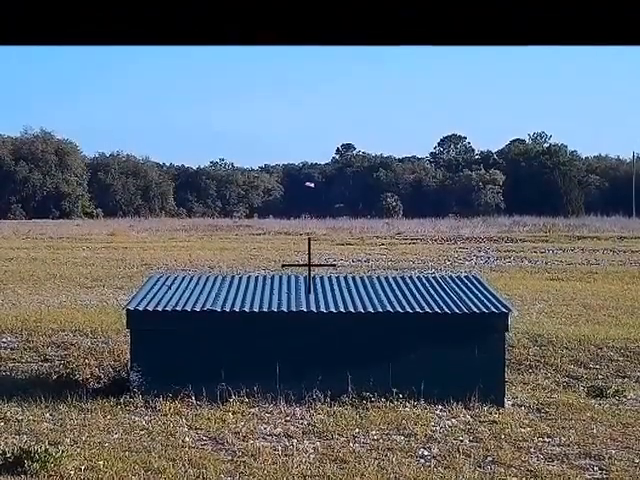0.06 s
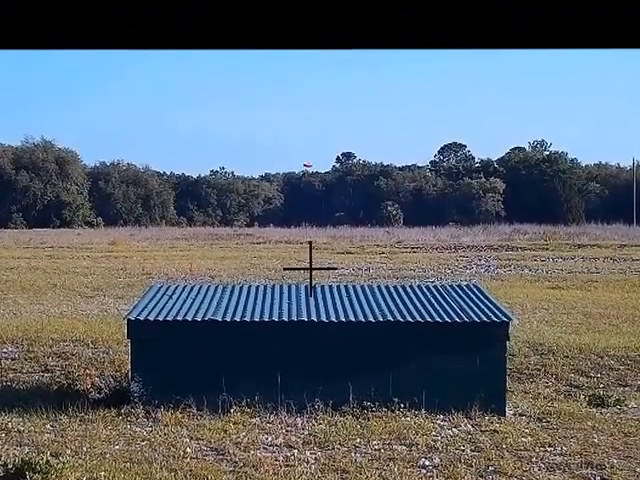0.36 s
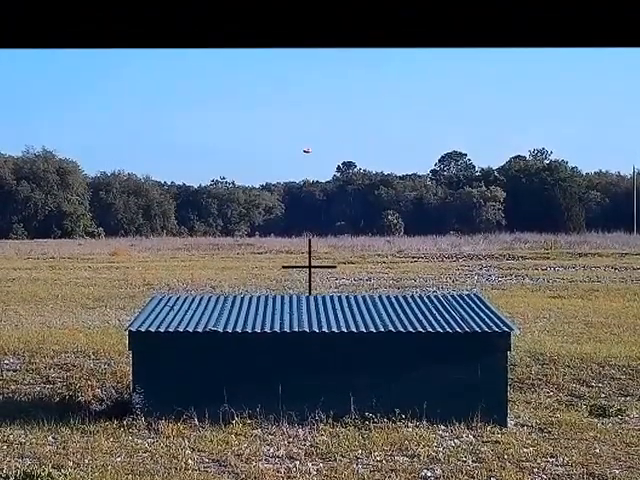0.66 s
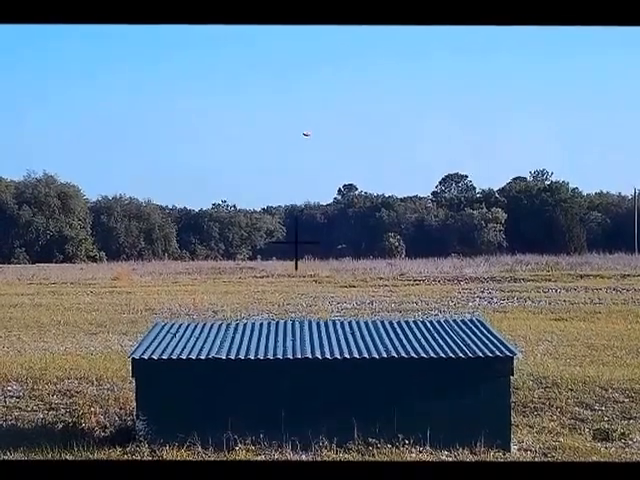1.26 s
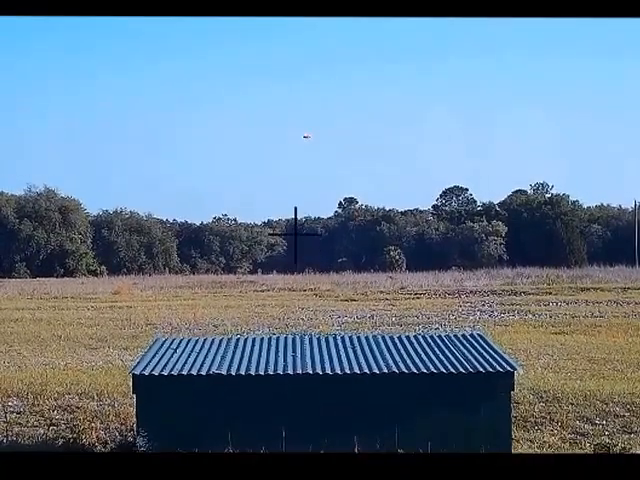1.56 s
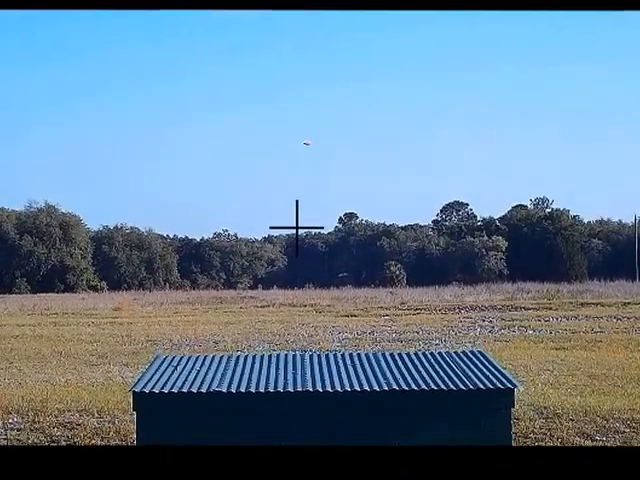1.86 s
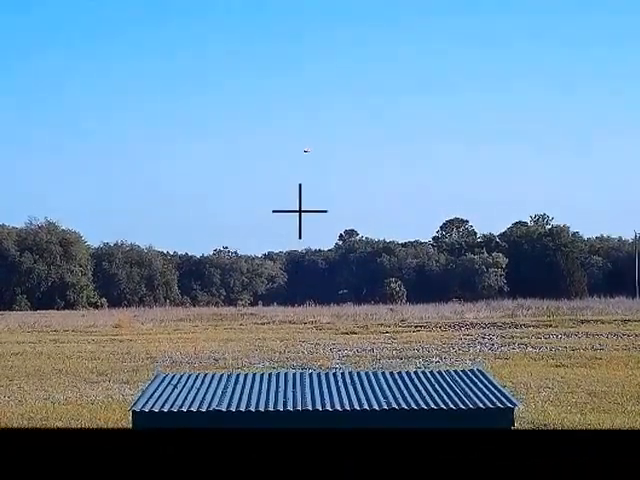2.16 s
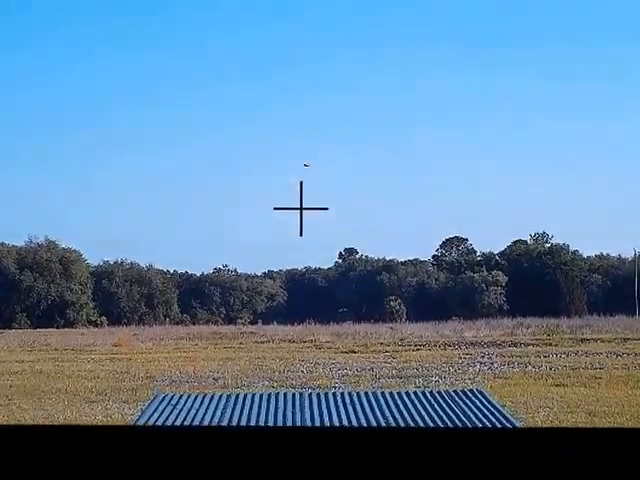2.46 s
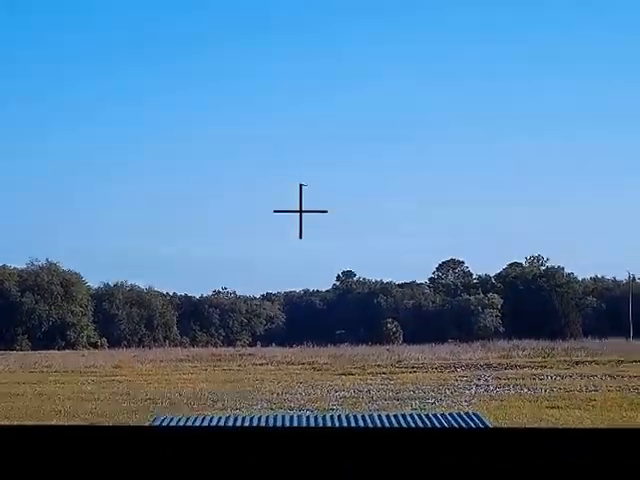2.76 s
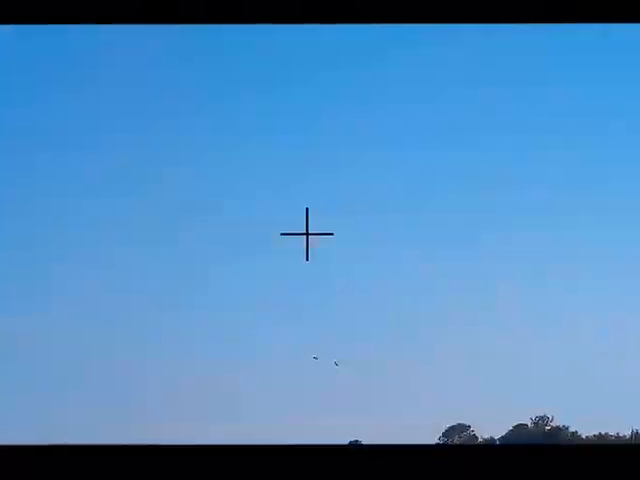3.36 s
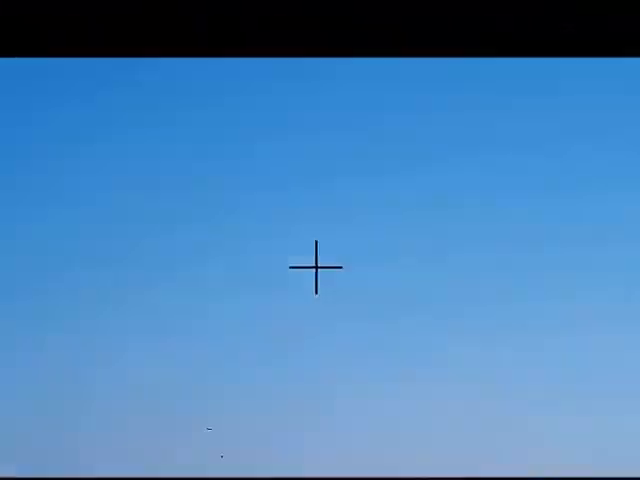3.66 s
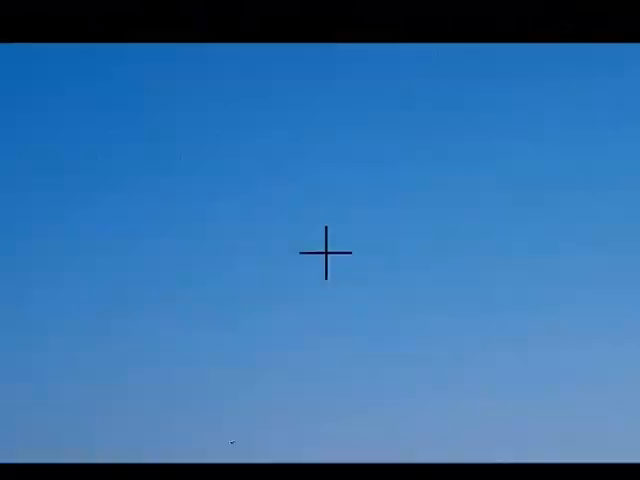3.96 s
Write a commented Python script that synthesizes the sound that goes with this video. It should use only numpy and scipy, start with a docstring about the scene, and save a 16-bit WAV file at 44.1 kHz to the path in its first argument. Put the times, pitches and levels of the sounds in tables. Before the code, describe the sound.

One loud, distorted shotgun blast breaks the quiet of a field, heard from a microphone on the gun. Barely audible hand rubs come first; quick mechanical knocks, a thin steel ring and a fading echo follow the shot.

```python
"""One shotgun shot over a field

A shot at a clay target is heard by a small camera fixed to the gun. Hands rub on the stock, then the
blast overloads the microphone for a tenth of a second. The gun's moving parts clatter, the stock
knocks and the steel rings on one note while the bang rolls back from the trees."""
import sys
import numpy as np
from scipy import signal
from scipy.fft import rfft, irfft
from scipy.io import wavfile

SR = 44100
rng = np.random.default_rng(int(sys.argv[2]) if len(sys.argv) > 2 else 0)


def unload_wav(signal):
    """Save mono or channel-first audio to the path in sys.argv[1] as 16-bit WAV at rate SR, clipped to [-1, 1]."""
    wavfile.write(
        sys.argv[1],
        SR,
        np.round(np.clip(np.atleast_2d(signal).T, -1, 1) * 32767).astype(np.int16),
    )


N = 176400  # 4 seconds
BAND_HZ = 3800  # the microphone hears little above this


def from_db(db):
    """Turn decibels into a number to multiply by."""
    return 10 ** (np.asarray(db) / 20)


def since(start):
    """Seconds since a moment, zero before it."""
    return np.maximum(np.arange(N) / SR - start, 0)


def noise(colour):
    """Noise of strength 1 in the microphone's band; its colour says which frequencies are strong."""
    hz = np.maximum(np.arange(N // 2 + 1) * SR / N, 1)
    points, db = np.transpose(colour)
    gain = from_db(np.interp(np.log(hz), np.log(points), db)) * (hz < BAND_HZ)
    x = irfft(rfft(rng.standard_normal(N)) * gain, N)
    return x / x.std()


def burst(start, db, rise, hold, fall):
    """Loudness over time: it rises, holds, then fades by `fall` dB per second."""
    return np.minimum(since(start) / rise, 1) * from_db(db - fall * since(start + rise + hold))


def low_pass(x, hz):
    """Cut away the sound above a frequency."""
    return signal.sosfilt(signal.ellip(10, .1, 85, hz, fs=SR, output="sos"), x)


# The tone of the hiss and of the hum. Each row: frequency in Hz, relative level in dB.
HISS_COLOUR = [(20, 3), (35, -2.5), (60, -19), (110, -14.5), (165, -15), (260, -13.5), (400, -20),
               (2500, -21), (3800, -21)]
HUM_COLOUR = [(110, -52.5), (150, -18), (166, 2.5), (185, -21.5), (260, -41.5)]

def background():
    """Steady hiss and rumble; a faint hum comes and goes."""
    swell = np.exp(-((since(0) - 2.25) / 0.95) ** 2)  # loudest at 2.25 seconds
    hum = from_db(-77) * swell * noise(HUM_COLOUR)
    return from_db(-66) * noise(HISS_COLOUR) + hum


# Hands shifting. Each row: start in seconds, level in dB, rise in seconds, fade in dB per second.
RUBS = [(.02, -61.5, 0.01, 117), (.125, -67, 0.03, 220), (.21, -57.5, 0.028, 178)]
# The tone of a rub. Each row: frequency in Hz, relative level in dB.
RUB_COLOUR = [(90, -22), (170, -9.5), (240, 3.5), (320, -8), (420, -23), (680, -14), (1000, -33),
              (3800, -41)]

def hands():
    """Hands settle on the stock with a dull rub."""
    return noise(RUB_COLOUR) * sum(burst(start, db, rise, 0, fall) for start, db, rise, fall in RUBS)


# The returning bangs. Each row: start in seconds, level in dB, rise in seconds,
# fade in dB per second, tilt in dB per octave (higher is brighter).
ECHOES = [(3.188, -9.5, .03, 137, -0.5), (3.45, -32, .04, 95.5, -2.5), (3.6, -38.5, 0.036, 11, -1),
          (3.681, -50, 0.037, 12, 2.5)]
# Their tone before the tilt. Each row: frequency in Hz, relative level in dB.
ECHO_COLOUR = [(30, -3.5), (65, 8.5), (140, -6), (245, 9), (380, -7.5), (600, -3), (1100, -6), (1600, -6),
               (2200, -18), (3000, -20.5), (3800, -31)]

def echoes():
    """The bang scatters back from the ground, a shed and trees, each echo with its own brightness."""
    out = np.zeros(N)
    for start, db, rise, fall, tilt in ECHOES:
        colour = [(hz, level + tilt * np.log2(hz)) for hz, level in ECHO_COLOUR]
        out += burst(start, db, rise, 0, fall) * noise(colour)
    return out


# Blows that set the steel ringing. Each row: start in seconds, level in dB.
STEEL_BLOWS = [(3.182, -28), (3.478, -50)]

def steel(pitch_hz=1413, ring_seconds=2.93):
    """The gun's steel rings on one long, clean note, topped up by each blow."""
    level = sum(burst(start, db, .003, 0, 60 / ring_seconds) for start, db in STEEL_BLOWS)
    return level * np.sin(2 * np.pi * pitch_hz * since(0))


# Knocks of the hammer, moving parts, stock and hands. Each row: start in seconds, note level in dB,
# pitch in Hz, swell in seconds, hardness (higher is sharper), rattle level in dB.
KNOCKS = [(3.158, -31, 656, 0.025, .1, -29), (3.1748, -16, 1060, 0.0029, .2, -28),
          (3.221, 2.5, 196.5, 0.0047, .1, -52), (3.276, -2, 862, 0.0035, .1, -26),
          (3.285, -11.5, 687, 0.0048, 2, -18), (3.305, -24, 908, 0.0035, 3.4, -23),
          (3.3235, -26, 712, 0.002, 3.1, -41.5), (3.3445, -7.5, 880, 0.0029, 2.4, -22),
          (3.3608, 0, 530.3, 0.0037, 5.5, -16.5), (3.423, -32.5, 1967, 0.0048, .1, -38.5),
          (3.4691, -5.5, 257.2, 0.006, 2.2, -24.5), (3.523, -24.5, 244, 0.0037, .8, -38),
          (3.593, -28, 649, .006, 0.37, -41.5), (3.613, -41, 1817, 0.0047, .1, -36),
          (3.7385, -24, 238, 0.004, .3, -50), (3.7394, -33.5, 1535, 0.0033, 0.085, -41.5),
          (3.778, -35, 243, 0.003, .1, -60), (3.931, -24, 868, 0.0054, 0.37, -32),
          (3.959, -35.5, 1091, 0.0076, 0.44, -35), (3.968, -34, 54.6, 0.019, .1, -45)]
# The tone of the rattle. Each row: frequency in Hz, relative level in dB.
RATTLE_COLOUR = [(60, -13), (250, 5.5), (600, 7), (1000, 1), (1600, 4.5), (2100, 4), (2600, -34),
                 (3800, -28.5)]

def knocks():
    """Each knock is a few quick bounces that rattle loose parts and leave a short shudder."""
    out = np.zeros(N)
    rattle = noise(RATTLE_COLOUR)
    uneven = 0.098 * noise([(15, -20), (150, 0), (1500, -70)])  # bounces come a little early or late
    for start, note_db, hz, swell, hardness, rattle_db in KNOCKS:
        t = since(start)
        hit = (t / swell * np.exp(1 - t / swell)) ** 2.07  # the power narrows the peak
        shudder = from_db(-4) * np.minimum(t / swell, 1) * np.exp(-t / 0.0073)
        cycles = hz * (since(0) - start) + uneven * min(hz / 700, 1.5)
        contact = np.exp(hardness * np.sin(2 * np.pi * cycles))  # one push per bounce
        bounces = (contact - contact.mean()) / (contact.max() - contact.mean())
        grit = rattle * np.sqrt(contact / contact.mean())
        out += (hit + shudder) * (from_db(note_db) * bounces + from_db(rattle_db) * grit)
    return out


# The blast and kick. Each row: start in seconds, level in dB, hold in seconds, fade in dB per second.
BLASTS = [(3.1773, 5, 0.01, 295.5), (3.223, -4, 0.0034, 223), (3.262, 0.5, 0.017, 1099.5)]
# Their tone. Each row: frequency in Hz, relative level in dB.
BLAST_COLOUR = [(30, -14), (90, -6), (180, -0.5), (450, 0), (740, -3), (910, 6), (1100, -0.5), (1600, 1),
                (2100, -4.5), (3000, -13.5), (3800, -30)]

def blast(rise_seconds=0.0025):
    """The blast from the barrel and the backward kick shake the gun violently."""
    level = sum(burst(start, db, rise_seconds, hold, fall) for start, db, hold, fall in BLASTS)
    return level * noise(BLAST_COLOUR)


def scene():
    """The gun and its echoes over a quiet field, in one channel."""
    return (hands() + blast() + knocks() + steel() + echoes() + background())[None]


def record(dry):
    """The microphone swings more freely one way than the other, and loud peaks overload it."""
    bend, ceiling = 0.42, from_db(-2)
    lopsided = dry + np.hypot(dry, bend) - bend
    # Cutting below 7.7 Hz lets the signal settle back to rest after a one-sided swing.
    centred = signal.sosfilt(signal.butter(1, 7.7, "high", fs=SR, output="sos"), lopsided)
    muffled = low_pass(np.clip(centred, -ceiling, ceiling), BAND_HZ)
    flattened = np.clip(from_db(.8) * muffled, -1, 1)  # a small boost overloads it again
    return low_pass(flattened, hz=15800)


dry = scene()
out = record(dry)
unload_wav(out)
```